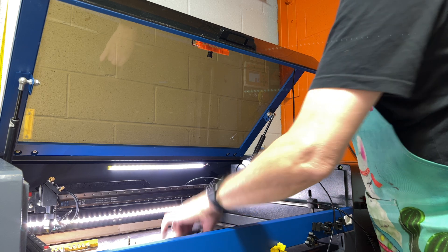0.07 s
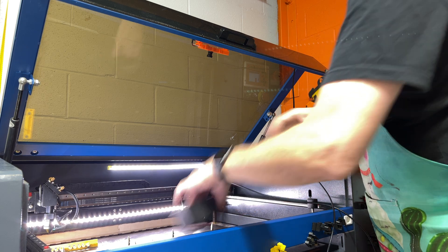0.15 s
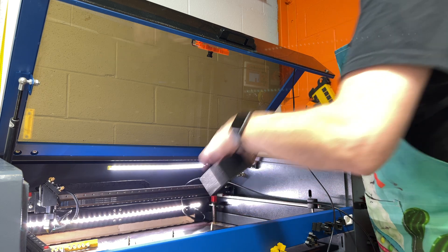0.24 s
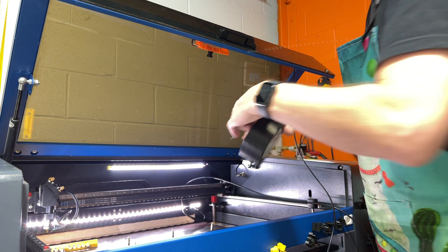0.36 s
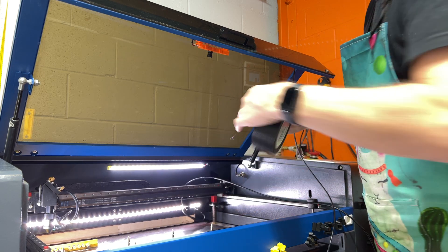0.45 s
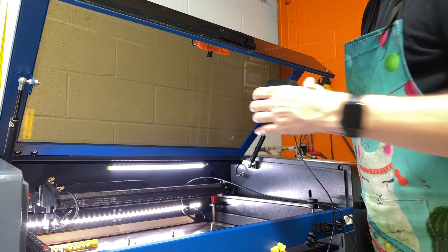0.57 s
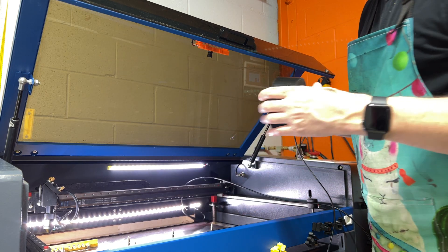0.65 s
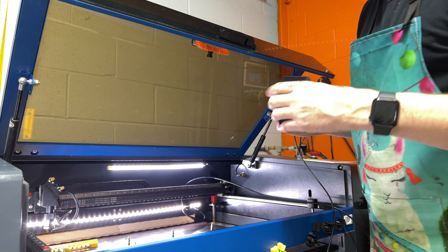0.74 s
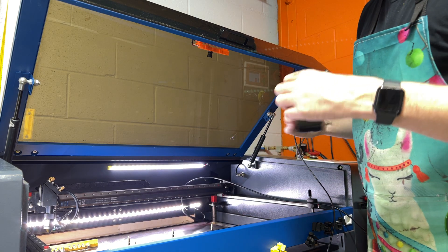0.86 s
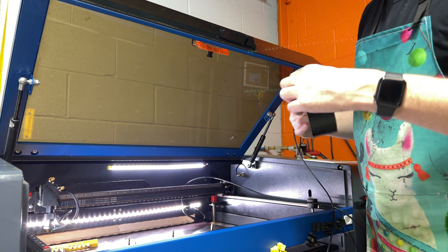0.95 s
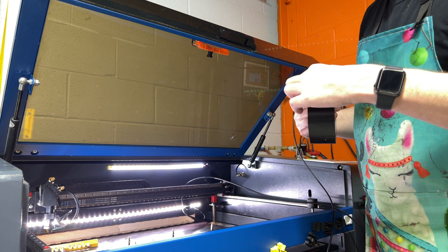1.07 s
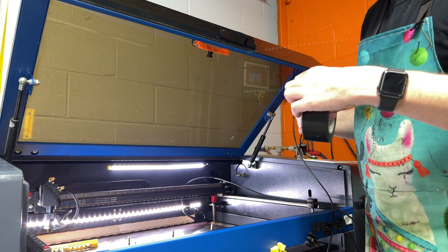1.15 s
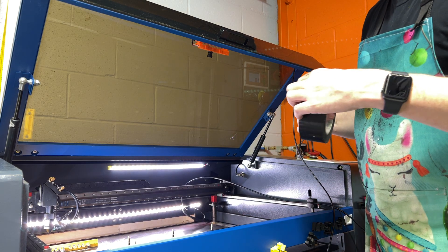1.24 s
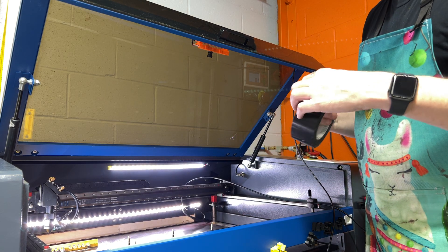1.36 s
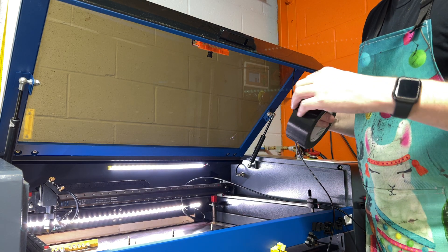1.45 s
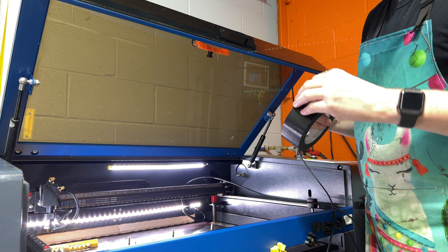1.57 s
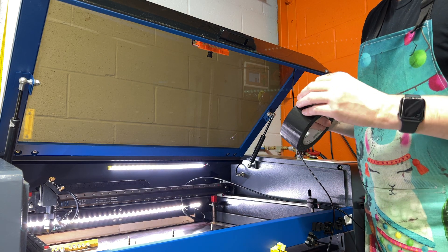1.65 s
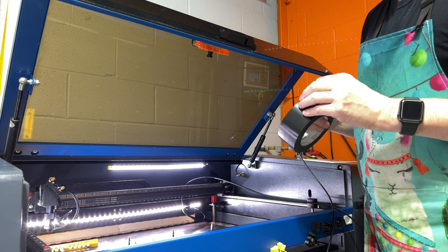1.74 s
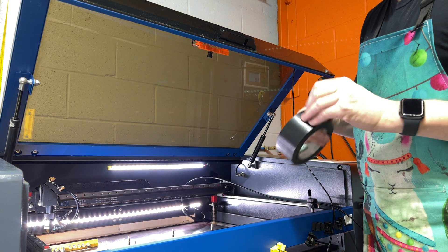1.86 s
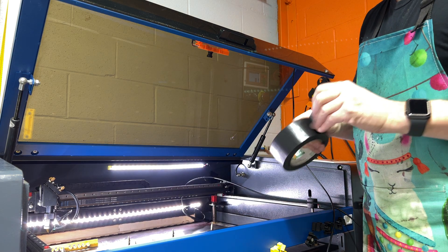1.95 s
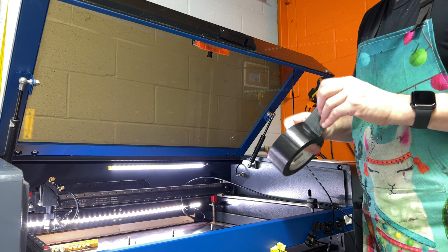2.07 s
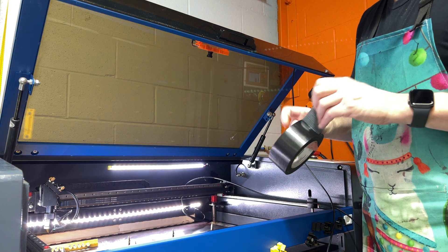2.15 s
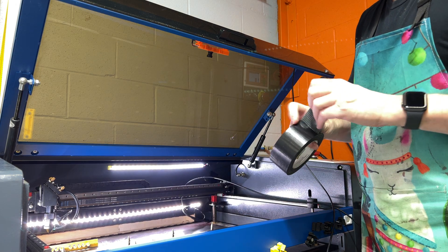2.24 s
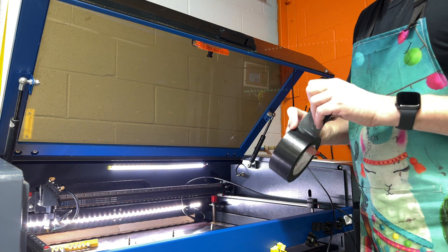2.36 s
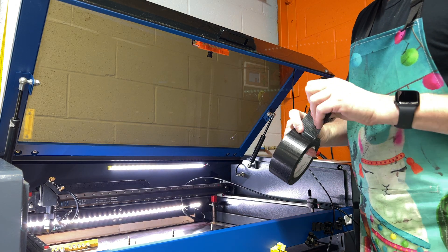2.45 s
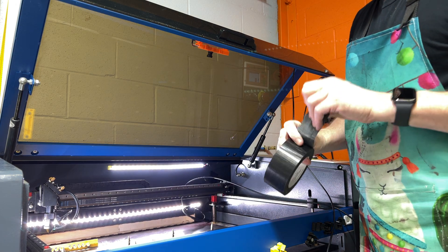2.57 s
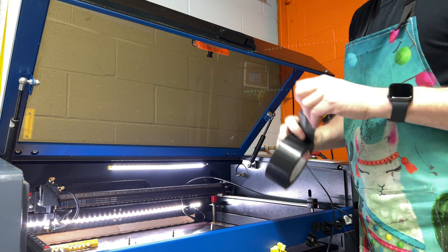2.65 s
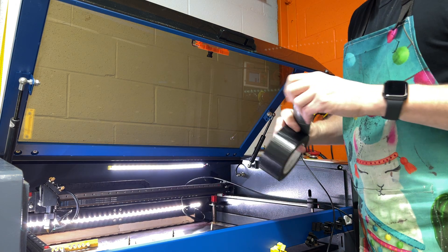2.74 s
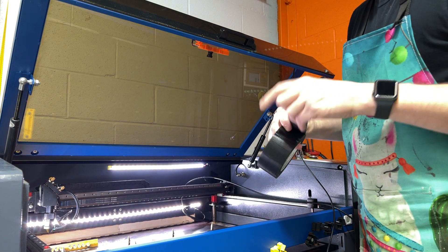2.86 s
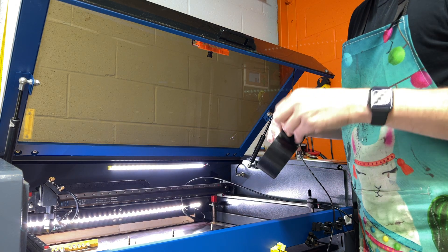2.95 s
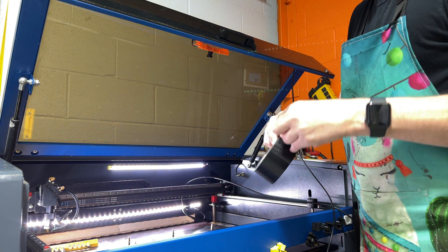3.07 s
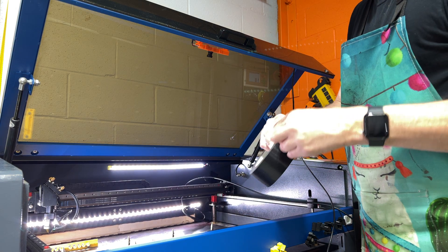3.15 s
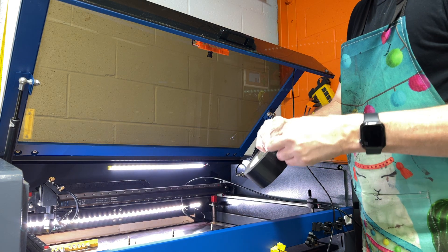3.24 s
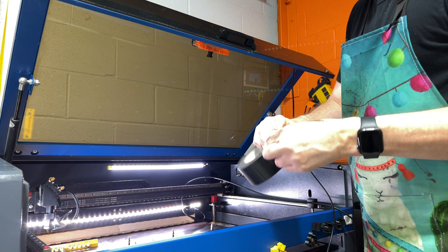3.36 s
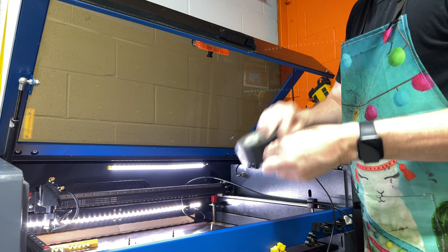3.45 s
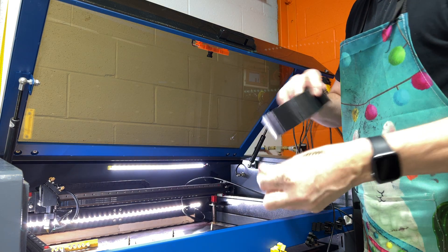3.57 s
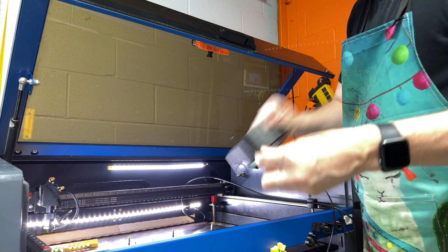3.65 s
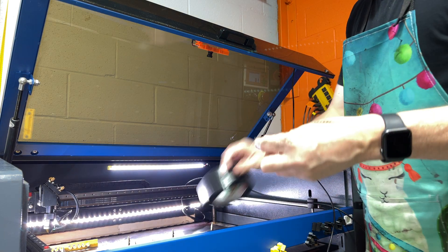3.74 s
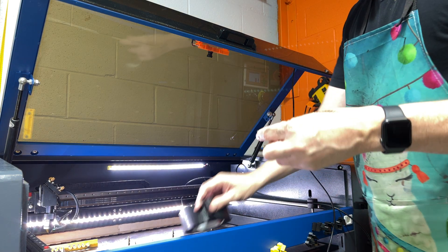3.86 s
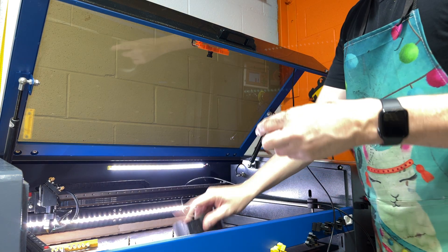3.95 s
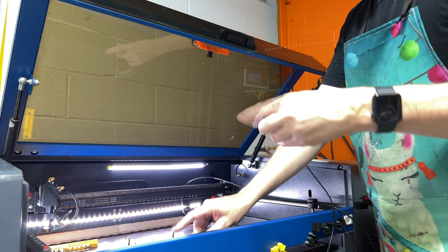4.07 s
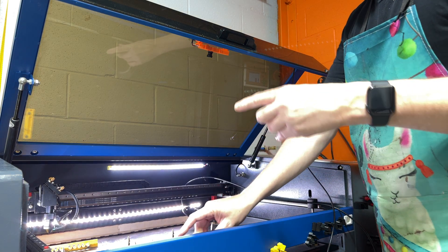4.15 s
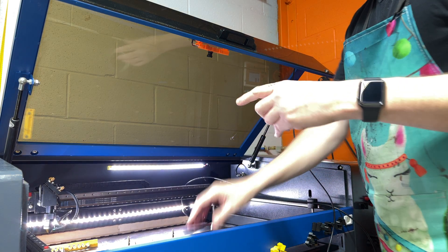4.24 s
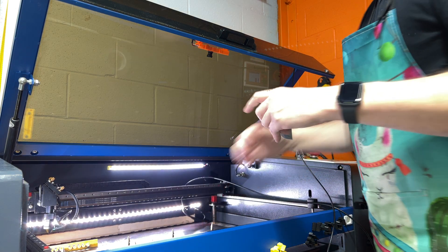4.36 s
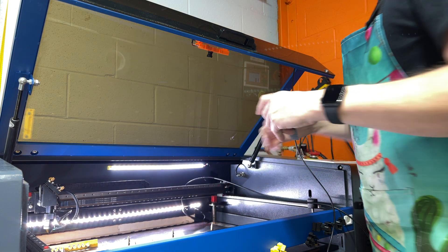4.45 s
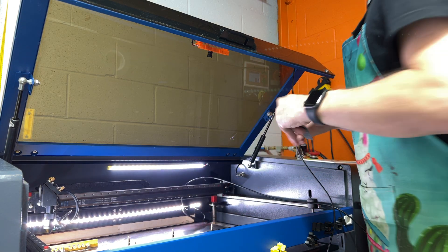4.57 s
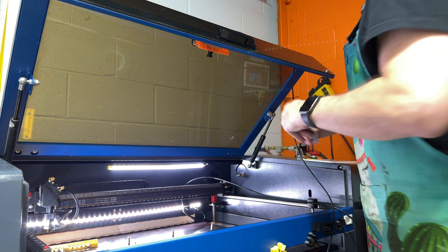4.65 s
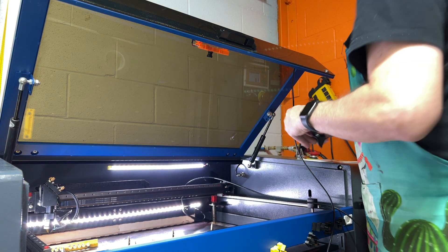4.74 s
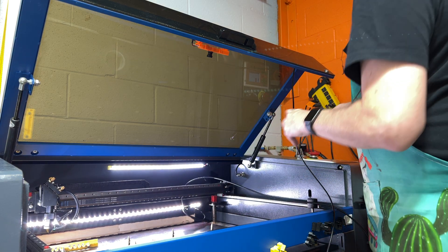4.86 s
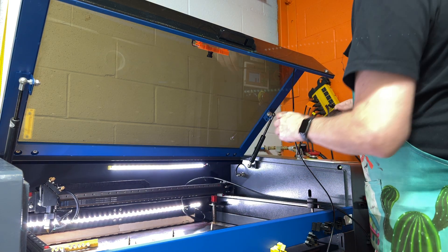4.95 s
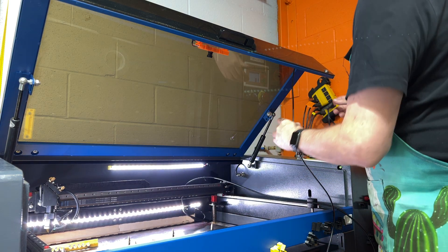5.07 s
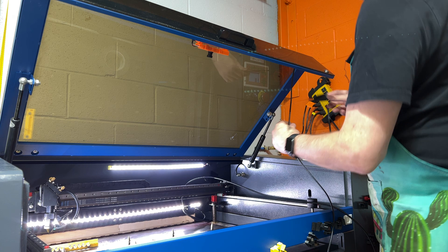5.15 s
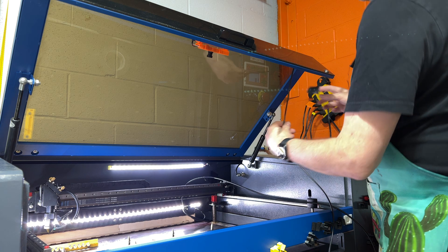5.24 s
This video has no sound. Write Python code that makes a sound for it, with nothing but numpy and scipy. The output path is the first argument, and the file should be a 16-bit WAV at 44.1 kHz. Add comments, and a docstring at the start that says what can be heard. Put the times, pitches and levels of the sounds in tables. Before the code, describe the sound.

A few sticky ticks come from the end of a roll of duct tape, followed by two sharp, crackling rips about a second apart, the second the loudest. The roll lands lightly and slides in short shoves, then the tape gives one more snap. Everything is heard from nearby indoors, with a short ring from an open metal cabinet and a faint, steady fan and mains hum underneath.

```python
"""A fan hisses and the mains hums in a workshop. Then a nail picks at the end of some duct tape, and
the tape is jerked off the roll and torn across: glue and threads snap, making the tape ring.
The roll is set down and scrapes over a machine bed, and the strip is pressed on a frame.
An open steel cabinet echoes every snap, rip and scrape; a few dull bumps fall in between."""
import sys
import numpy as np
from scipy import signal
from scipy.fft import rfft, irfft, next_fast_len
from scipy.io import wavfile
from scipy.ndimage import uniform_filter1d, map_coordinates

SR = 44100
rng = np.random.default_rng(int(sys.argv[2]) if len(sys.argv) > 2 else 0)


def unload_audio(sound):
    """Save the sound as a 16-bit wav file, at the path given as the first command line argument."""
    columns = np.transpose(np.atleast_2d(sound))
    # keep every value between -1 and 1, then stretch to whole-number steps
    steps = np.round(np.clip(columns, -1, 1) * 32767)
    wavfile.write(sys.argv[1], SR, steps.astype(np.int16))


N = 233813

# Glue or thread snaps: t/s, low ring f/Hz, level/dB, high ring f/Hz, level/dB, damping (width over pitch)
TAPE_SNAPS = [ (1.6742, 2720, -50, 7230, -32.5, .35), (1.693, 2000, -44, 6040, -28, .3),
              (1.7274, 1900, -28.5, 5000, -22, 0.26), (1.734, 2400, -34, 6200, -29, 0.18),
              (1.7958, 1120, -12.5, 5420, -1.5, 0.21), (1.8488, 1540, -23.5, 6860, -34, 0.17),
              (1.854, 553, -22.5, 4400, -32, 0.39), (2.3825, 1540, 2, 5740, 3, 0.18),
              (2.389, 1790, -3.5, 5700, -10, 0.27), (2.399, 2260, -2.5, 5300, -18, .2),
              (2.4047, 2750, -5, 5500, 1.5, 0.18), (2.4139, 1000, -22, 4600, -14, 0.67),
              (2.43, 563, -19, 3820, -6, 0.14), (2.628, 2040, -26, 5800, -21, 0.16),
              (2.6314, 1045, -26.5, 5440, -14.5, 0.19), (2.7, 2070, -39, 6150, -37.5, .25),
              (3.303, 1670, -4, 5000, 5, 0.46), (3.306, 2400, -4, 4740, 3.5, .3),
              (3.3134, 1556, 8.5, 4730, 5, 0.16), (3.321, 1970, 4.5, 5400, -2, 0.27),
              (3.823, 2050, -26.5, 6170, -33, 0.22), (3.947, 1400, -9.5, 5600, -3.5, 0.32),
              (4.6542, 1870, -19, 5800, -48, .1), (4.6625, 1994, -7.5, 5800, -28, 0.084),
              (4.6683, 1500, -4, 6300, -10, .17), (4.6762, 3270, -13, 5570, -9, 0.21)]
# Rips: full at t/s, rise/s, hold/s, edge delay/s, strip level/dB; roll, fold, edge level/dB over that
TAPE_RIPS = [(2.379, 0.0035, .02, 0.00038, -31.5, 3.5, 5, 2.5),
             (3.313, 0.013, 0.0092, -0.0065, -17, -9, -9, -0.5),
             (4.662, 0.025, 0.011, -0.0011, -41, -4.5, -11.5, -8)]
# How fast a rip fades: strip, roll, fold, edge, each as fall/(dB/s)
RIP_FADES = [437, 595, 494, 413]
# Where the roll, free strip, peeling edge and creased tape ring: f/Hz, width/Hz, weight/dB
ROLL_RINGS = [(610, 620, 5), (1047, 1100, 7.5)]
STRIP_RINGS = [(1670, 1070, -2.8), (2223, 450, 2.3), (2850, 1130, -4)]
EDGE_RINGS = [(5100, 440, 5.6), (5940, 1100, 3.5), (7430, 1160, 1.5)]
FOLD_RINGS = [(3700, 2100, 0.0051), (4900, 3150, 0.5)]
# The roll lands: full at t/s, rise/s, hold/s
LANDING_TIMING = (3.976, .018, .032)
# Its loudness: bed level/dB; thud, fold, grit level/dB over that
LANDING_LEVELS = (-24.5, -7.5, -7, -6)
# How fast it fades: bed, thud, fold, grit, each as fall/(dB/s)
LANDING_FADES = [450, 480, 380, 600]
# Three shoves of the roll, one list each: t/s, level/dB, grit level/dB over that
SHOVES = [
    [(4.062, -53, -24), (4.078, -35.5, -16), (4.09, -28.5, -5), (4.146, -35.5, -5), (4.16, -37.5, -10),
     (4.182, -32.5, -20), (4.194, -43, -13), (4.24, -48, -22), (4.243, -46, -26)],
    [(4.243, -43, -26), (4.249, -36, -21), (4.281, -34, -17), (4.295, -40, -16), (4.301, -38, -26)],
    [(4.301, -32, -34), (4.309, -29, -17), (4.341, -34.5, -13), (4.357, -34.5, -18), (4.385, -28, -15),
     (4.409, -36, -9.5), (4.431, -38.5, -19), (4.48, -75, -16)],
]
# Where the bed rings, low (thud), middle and high (grit): f/Hz, width/Hz, weight/dB
THUD_RINGS = [(239, 175, -1.5), (392, 250, 4.5), (848, 320, 5.5)]
BED_RINGS = [(1232, 780, -1.5), (1920, 1120, 1), (2870, 890, -1.83)]
GRIT_RINGS = [(5430, 1200, 0.62), (7520, 3600, -1.7)]
# Dull bumps: t/s, level/dB, f/Hz, time to fade by 60 dB/s
LOW_BUMPS = [(2.201, -56, 200, 0.16), (2.224, -48, 190, 0.068), (2.25, -42, 233, 0.057),
             (2.29, -48.5, 213, 0.05), (3.715, -54.5, 198, 0.06)]
# The cabinet's echo: f/Hz, time to fade by 60 dB/s
CABINET_DECAY = [(200, 0.072), (1500, 0.16), (5000, 0.17), (9000, 0.093)]
# Background: t/s, whistle level/dB, hum level/dB, level/dB of the tone at 3 x mains relative to the hum
BACKGROUND_LEVELS = [(0.0, -57.5, -62, -19), (0.3, -54, -63, -13), (0.5, -51, -62, -15),
                     (1.25, -51, -60.5, -17.5), (1.9, -53, -61, -19), (2.75, -53, -61, -24),
                     (3.0, -52.5, -62, -14), (3.8, -50, -62, -13), (3.95, -49.5, -59.5, -13),
                     (4.1, -58.5, -56, -16), (4.43, -58.5, -58, -16), (4.81, -61.5, -57, -31),
                     (5.1, -59, -59.5, -18), (5.3, -58, -60.5, -17)]
# Tone colour of the fan's rush and of the low rumble: f/Hz, relative level/dB
RUSH_COLOUR = [(240, -32.5), (400, -6.5), (586, -11.5), (916, -12.5), (1190, -8), (1290, -9.5),
               (2120, -11.5), (4550, -6), (7120, -19), (9260, -30), (12000, -78), (20400, -120)]
RUMBLE_COLOUR = [(30, -42.5), (100, -27.5), (170, -10.5), (270, -7.5), (400, -1), (560, -0.5), (800, -6.5),
                 (1200, -36.5)]
# Air whistling in a duct: f/Hz, width/Hz, weight/dB
DUCT_RINGS = [(4163, 424, 5.5), (3090, 860, 0.5), (4680, 360, 1.5)]
# Tones of the hum: multiple of the mains frequency, relative level/dB
HUM_TONES = [(5, -3.5), (6, 2.5), (8, -10), (9, -8.5), (10, -10), (11, -9), (13, -13), (15, -11.5),
             (17, -15), (18, -9), (21, -21), (24, -13.5), (31, -15), (32, -9.5), (36, -18), (37, -13.5)]
# How well the microphone hears each pitch: f/Hz, level/dB
MIC_RESPONSE = [(20, -15), (150, -3.5), (400, -4), (7800, -1), (8500, -10), (9100, -32.5), (9400, -45)]


def tape_snaps():
    """Crackle swells, glue or a thread lets go with a click, and the free strip rings low and high."""
    out, crackle = np.zeros(N), grains(per_s=2500, spread_db=2.5, smooth=1.0)
    size, release = 8192, round(.004 * SR)  # in samples
    crackle_fade_s, low_widening = 0.051, 1.67
    late = (np.arange(size // 2) - release) / SR
    hz = np.fft.rfftfreq(size, 1 / SR)
    for s, low_hz, low_db, high_hz, high_db, damping in TAPE_SNAPS:
        at = round(s * SR) - release
        crackle_db = -24.5 - 0.37 * max(low_db, high_db)  # louder snaps have a smaller share of crackle
        shape_db = np.where(late < 0, 6000 * late, -60 * late / crackle_fade_s)
        burst = amp(crackle_db + shape_db) * crackle[at:at + len(late)]
        burst[release] = 1  # the click
        low = amp(low_db) * resonator([(low_hz, low_widening * damping * low_hz, 0)])(hz)
        high = amp(high_db) * resonator([(high_hz, damping * high_hz, 0)])(hz)
        out[at:at + size] += irfft(rfft(burst, size) * (low + high))
    return out


def tape_rips():
    """Many threads let go under a pull, shaking the strip, the roll, the fold and the peeling edge."""
    fold_delay_s = 0.022  # the fold sounds once a length of tape hangs free
    gains = 0
    for s, rise_s, hold_s, edge_delay_s, *levels in TAPE_RIPS:
        gains += swells((s, rise_s, hold_s), levels, RIP_FADES, [0, 0, fold_delay_s, edge_delay_s])
    crackle = grains(per_s=1600, spread_db=2.0, smooth=0.8)
    return ring(gains * crackle, [STRIP_RINGS, ROLL_RINGS, FOLD_RINGS, EDGE_RINGS])


def roll_on_bed():
    """The roll lands and slides; the rubbing is a stream of tiny clicks that catches unevenly."""
    t = np.arange(N) / SR
    thud_db, fold_db = -9.5, -21  # relative to the scrape
    gains = swells(LANDING_TIMING, LANDING_LEVELS, LANDING_FADES, delays_s=[0, 0, 0, 0])
    for shove in SHOVES:
        db, grit_db = curves(shove)
        moving = (t >= shove[0][0]) & (t < shove[-1][0])
        gains += moving * amp([db, db + thud_db, db + fold_db, db + grit_db])
    catch = amp(2.52 * wobble(per_s=200))
    friction = catch * grains(per_s=1800, spread_db=2.0, smooth=0.88)
    return ring(gains * friction, [BED_RINGS, THUD_RINGS, FOLD_RINGS, GRIT_RINGS])


def bumps():
    """Soft knocks, each a low tone that starts gently and dies away."""
    out, t = np.zeros(N + SR), np.arange(SR // 4) / SR
    onset = 1 - np.exp(-t / 0.0042)
    for s, db, hz, fade_s in LOW_BUMPS:
        gain = amp(db + 7.5 - 60 * t / fade_s) * onset
        out[round(s * SR):][:len(t)] += gain * np.sin(2 * np.pi * hz * t)
    return out[:N]


def cabinet_echo(x):
    """The steel cabinet rings on after a sound, each pitch dying at its own speed."""
    out, step, delay = np.zeros(N + SR), SR // 2, 130  # in samples
    for at in range(0, N, step):  # a new noise tail for each half second
        hz, t, noise = signal.stft(rng.standard_normal(step), SR, nperseg=256)
        fade = amp(-60 * t / at_pitch(CABINET_DECAY, hz)[:, None])
        tail = signal.istft(noise * fade, SR, nperseg=256)[1]
        echo = signal.fftconvolve(x[at:at + step], tail / np.linalg.norm(tail))
        out[at + delay:][:len(echo)] += echo
    return out[:N]


def fan_and_mains():
    """A fan rushes, air whistles in a duct, and the mains hums unsteadily over a low rumble."""
    mains_hz, rush_db, rumble_db = 60, -57.5, -7  # the rumble is relative to the hum
    whistle_db, hum_db, third_db = curves(BACKGROUND_LEVELS)
    rush = patchy_noise(colour(RUSH_COLOUR), patchy_db=0.5)
    whistle = patchy_noise(resonator(DUCT_RINGS), patchy_db=2.34)
    rumble = patchy_noise(colour(RUMBLE_COLOUR), patchy_db=4.5)
    phase = 2 * np.pi * mains_hz * np.arange(N) / SR - .6
    hum = sum(amp(db + 1.1 * wobble(3)) * np.sin(multiple * phase + 0.6 * wobble(3))
              for multiple, db in HUM_TONES + [(3, third_db)])
    whistle *= amp(whistle_db + 0.32 * wobble(9.4))
    rumble *= amp(rumble_db + 1.3 * wobble(23))
    return amp(rush_db) * rush + whistle + amp(hum_db) * (hum + rumble)


def swells(timing, levels, fades, delays_s):
    """Four gain curves that rise, hold and fade; the later levels are relative to the first."""
    full_s, rise_s, hold_s = timing
    db, *relative_db = levels
    rise_db = 23  # climbed during rise_s
    gains = []
    for offset_db, fall_db_per_s, delay_s in zip([0, *relative_db], fades, delays_s):
        late = np.arange(N) / SR - (full_s + delay_s)
        shape_db = np.minimum(rise_db * late / rise_s, 0) - fall_db_per_s * np.maximum(late - hold_s, 0)
        gains.append(amp(db + offset_db + shape_db))
    return np.array(gains)


def grains(per_s, spread_db, smooth):
    """Tiny random clicks of uneven size, mixed with a share of smooth noise."""
    clicks = (rng.random(N) < per_s / SR) * rng.choice([-1, 1], N)
    sizes = amp(spread_db * rng.exponential(1, N).clip(0, 3))
    return unit(unit(clicks * sizes) + smooth * rng.standard_normal(N))


def patchy_noise(response, patchy_db):
    """Filtered noise with louder and softer patches in time and pitch."""
    spectrum = signal.stft(rng.standard_normal(N), nperseg=512)[2]
    patches = uniform_filter1d(rng.standard_normal(spectrum.shape), size=5, axis=0)
    patches = uniform_filter1d(patches, size=8, axis=1)
    noise = signal.istft(spectrum * amp(patchy_db * unit(patches)), nperseg=512)[1][:N]
    return unit(filtered(noise, response))


def wobble(per_s):
    """A smooth curve through per_s random values a second."""
    coarse = np.arange(0, N + 32, 32)
    values = rng.standard_normal(int(N * per_s / SR) + 4)
    return np.interp(np.arange(N), coarse, map_coordinates(values, [coarse * per_s / SR]))


def resonator(rings):
    """A filter that rings like an object; white noise keeps its power through it."""
    def shape(f):
        once = sum((-1) ** k * amp(db) * 1j * f * width / (hz * hz - f * f + 1j * f * width)
                   for k, (hz, width, db) in enumerate(rings))
        return once ** 2  # applied twice for steeper sides
    rms = np.sqrt(np.mean(np.abs(shape(np.linspace(1, SR / 2, 2000))) ** 2))
    return lambda f: shape(f) / rms


def ring(shakes, parts):
    """Each shaking signal makes its own part ring; the sounds add up."""
    return sum(filtered(shake, resonator(part)) for shake, part in zip(shakes, parts))


def filtered(x, response):
    """Scale each frequency in x by response(hz)."""
    size = next_fast_len(N + SR // 2)
    return irfft(rfft(x, size) * response(np.fft.rfftfreq(size, 1 / SR)), size)[..., :N]


def colour(points):
    """A filter drawn through (f/Hz, level/dB) points."""
    return lambda hz: amp(at_pitch(points, hz))


def at_pitch(points, hz):
    """Read between (f/Hz, value) points on a log frequency scale."""
    f, values = np.transpose(points)
    return np.interp(np.log(hz + 1), np.log(f + 1), values)


def curves(rows):
    """Turn each column after the time into one value per sample."""
    s, *columns = np.transpose(rows)
    return [np.interp(np.arange(N) / SR, s, column) for column in columns]


def amp(db):
    """Turn decibels into a gain."""
    return 10 ** (np.asarray(db) / 20)


def unit(x):
    """Scale x to an average power of 1."""
    return x / np.sqrt(np.mean(x ** 2) + 1e-20)


def scene():
    """Tape and roll with their echo, then the bumps and the background, in one channel."""
    near = tape_snaps() + tape_rips() + roll_on_bed()
    return (near + amp(-11.0) * cabinet_echo(near) + bumps() + fan_and_mains())[None]


def record(dry):
    """A small microphone rounds off loud peaks, loses the highest treble and adds a faint hiss."""
    peak_limit, top_hz, hiss_db = .7, 9410, -101
    heard = filtered(dry, colour(MIC_RESPONSE))
    heard = heard / (1 + np.abs(heard / peak_limit) ** 4) ** (1 / 4)
    heard = filtered(heard, lambda hz: np.clip((top_hz - hz) / 300, 0, 1) ** 2)
    return heard + amp(hiss_db) * rng.standard_normal(dry.shape)


dry = scene()
out = record(dry)
unload_audio(out)
```